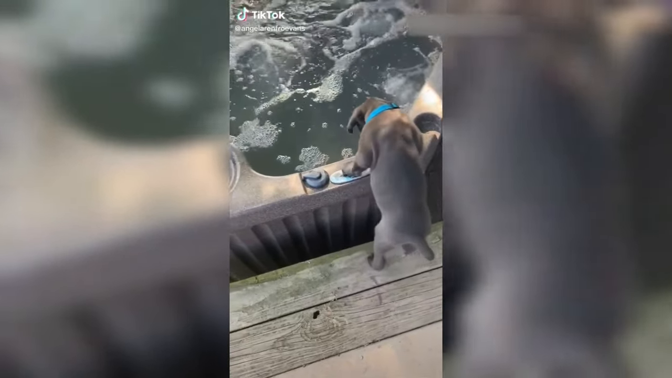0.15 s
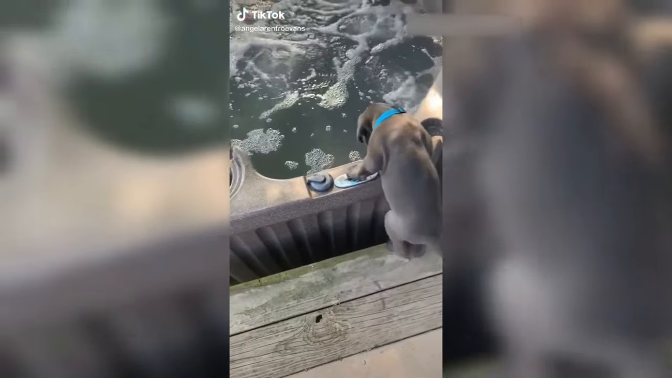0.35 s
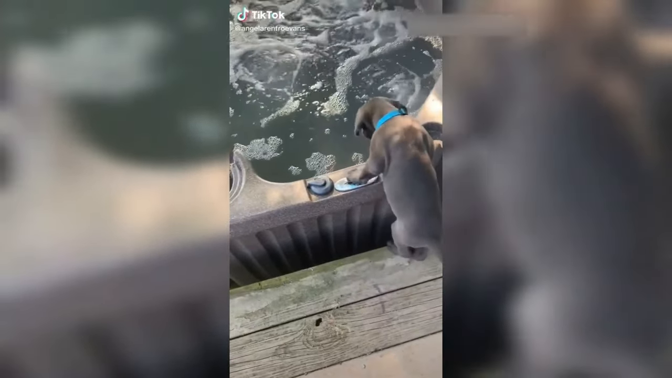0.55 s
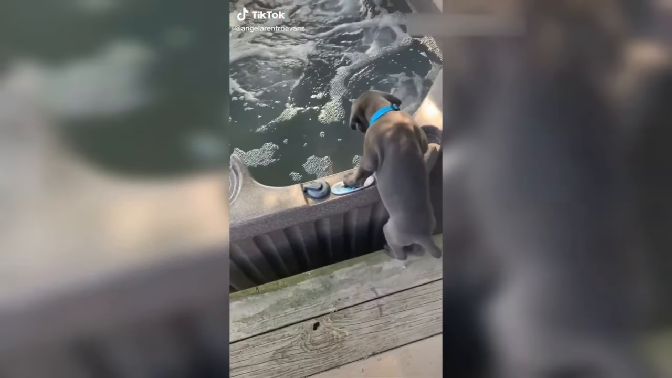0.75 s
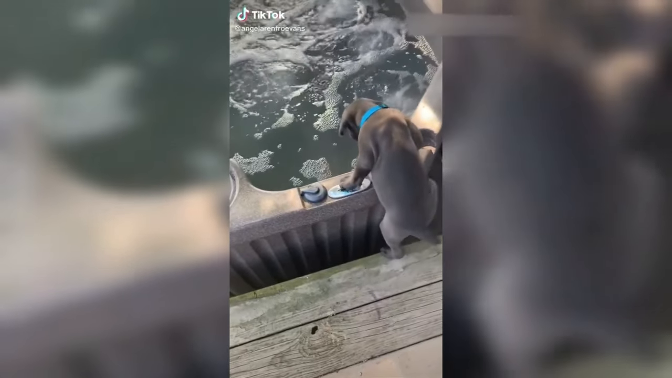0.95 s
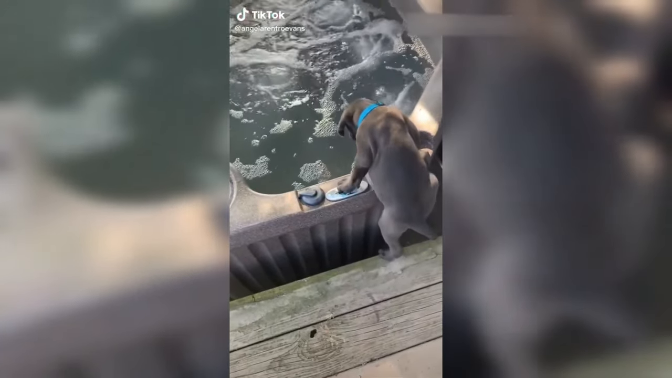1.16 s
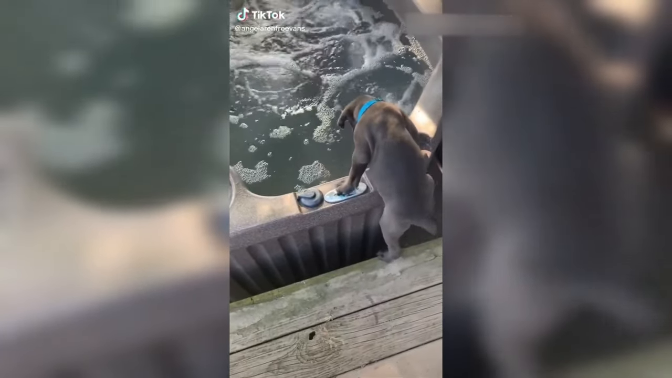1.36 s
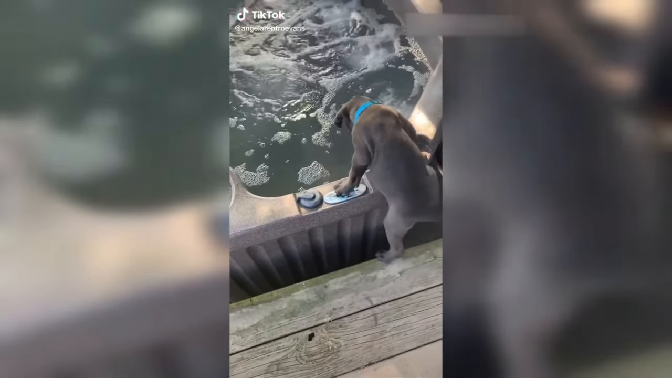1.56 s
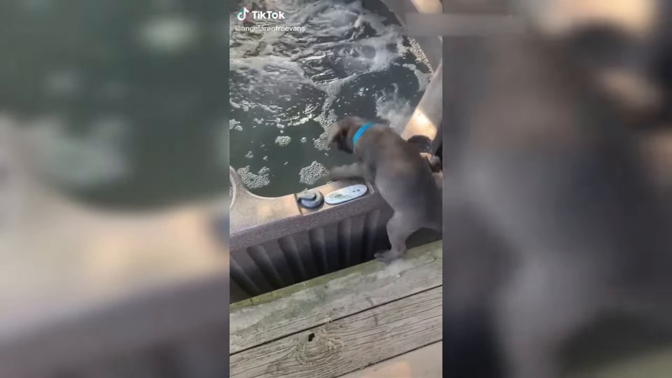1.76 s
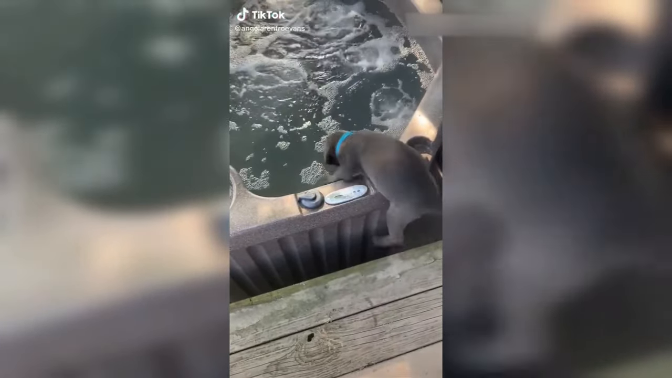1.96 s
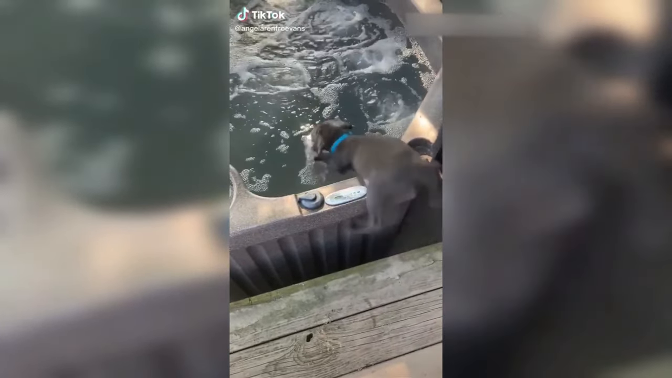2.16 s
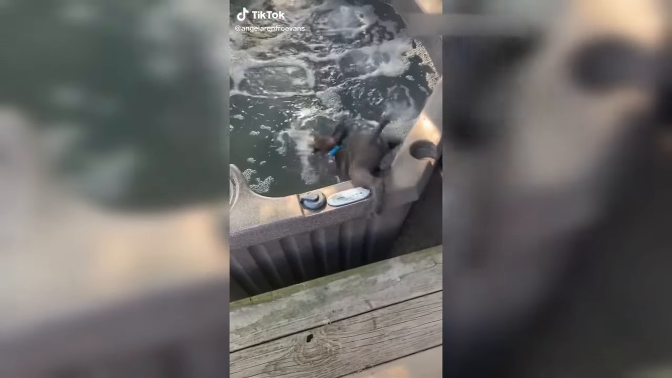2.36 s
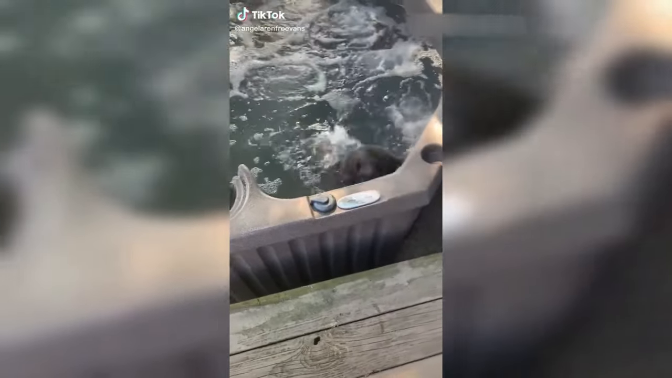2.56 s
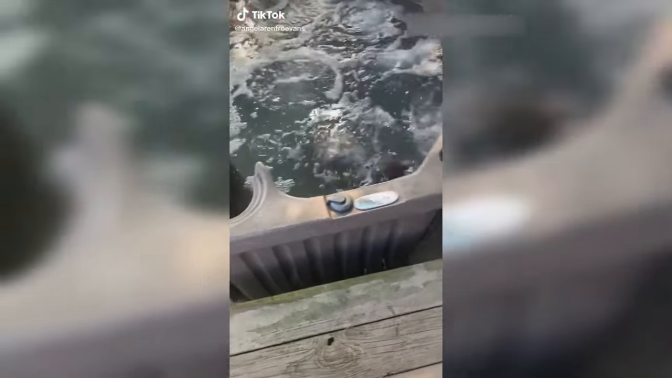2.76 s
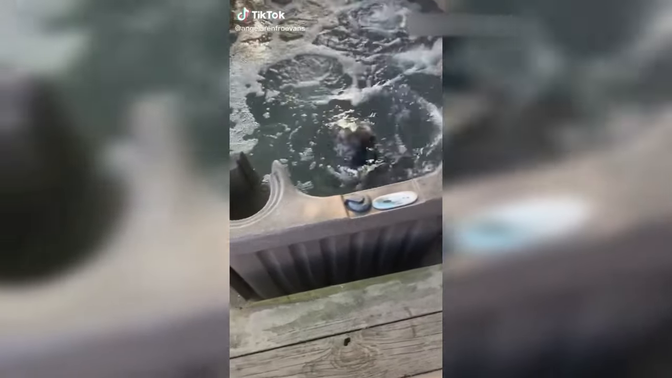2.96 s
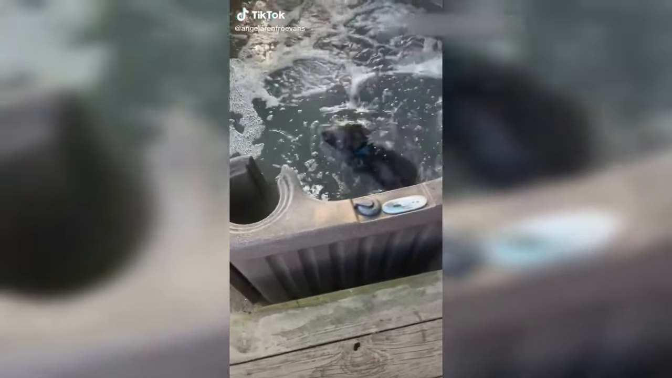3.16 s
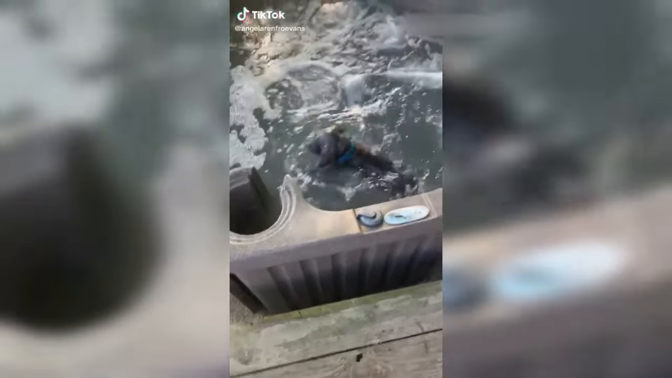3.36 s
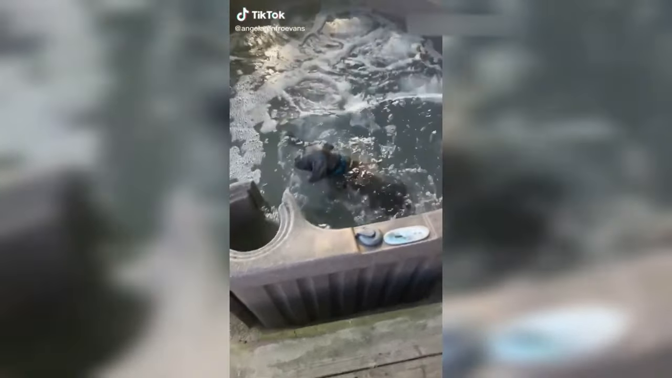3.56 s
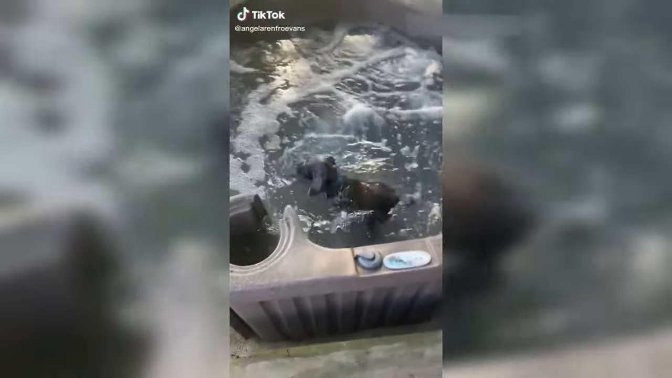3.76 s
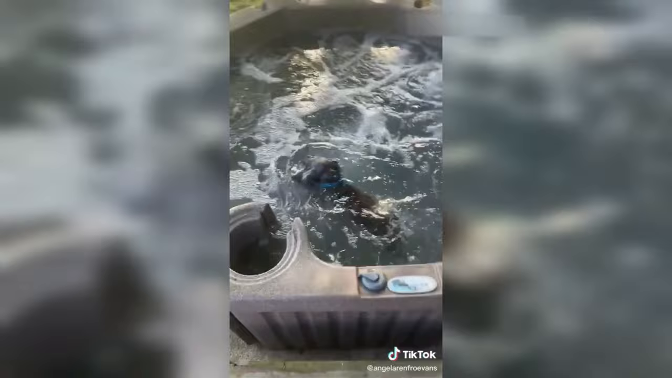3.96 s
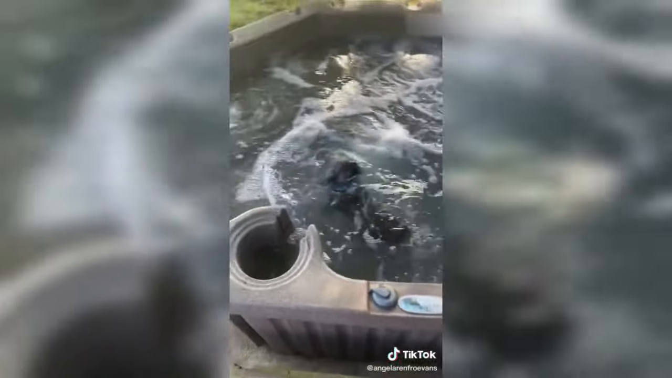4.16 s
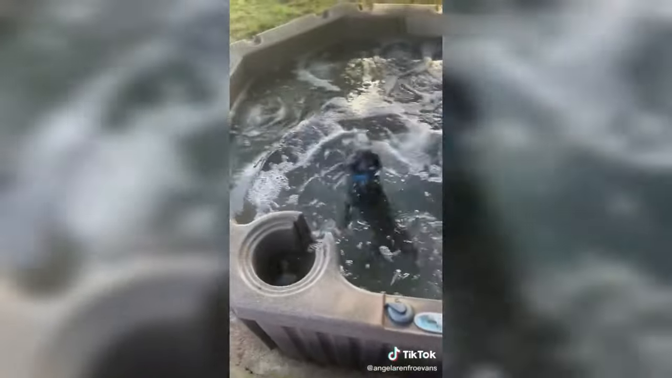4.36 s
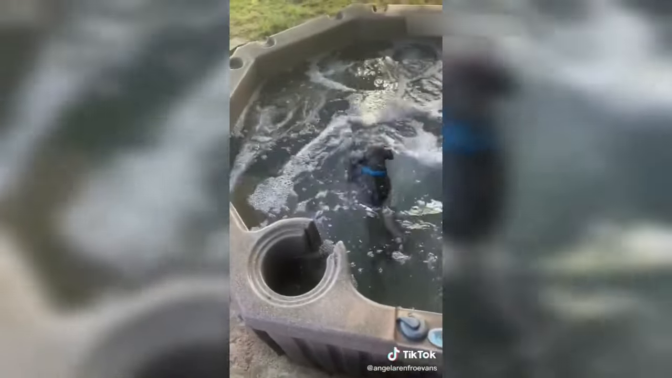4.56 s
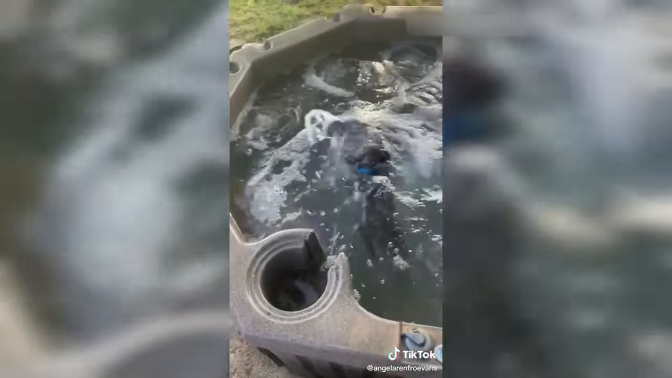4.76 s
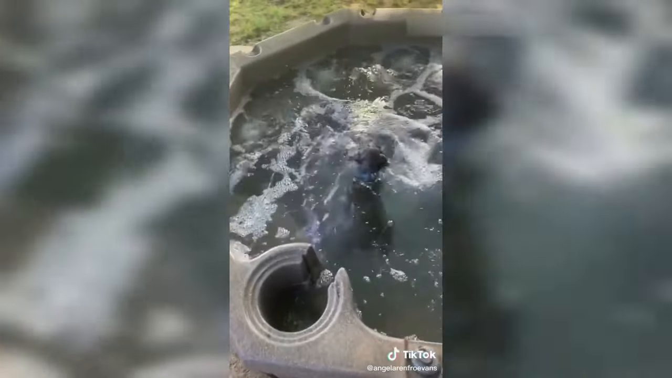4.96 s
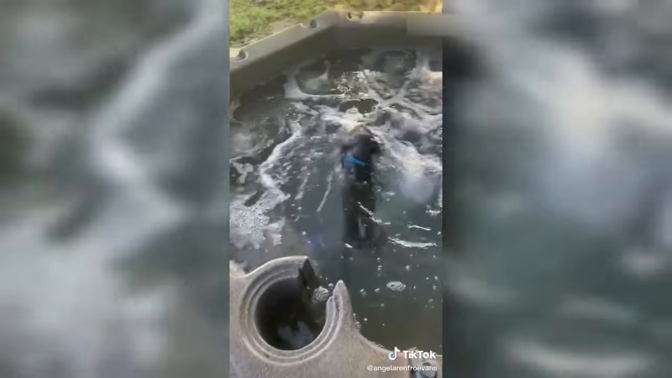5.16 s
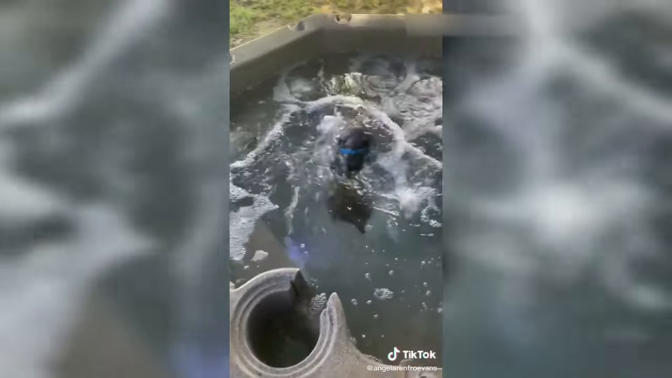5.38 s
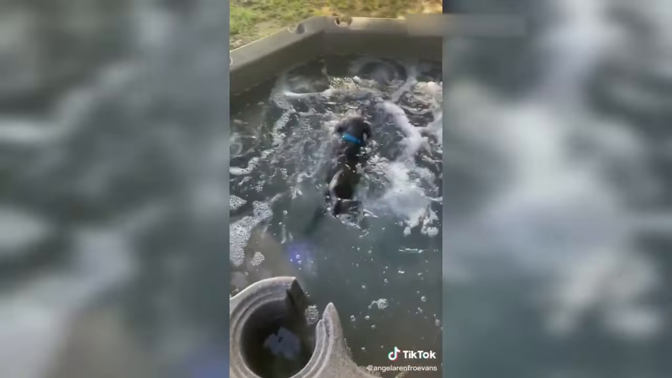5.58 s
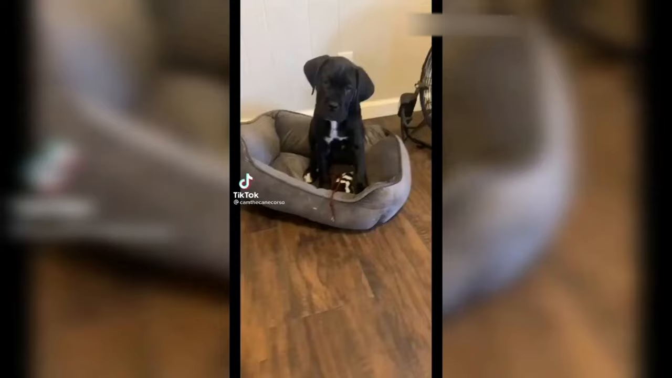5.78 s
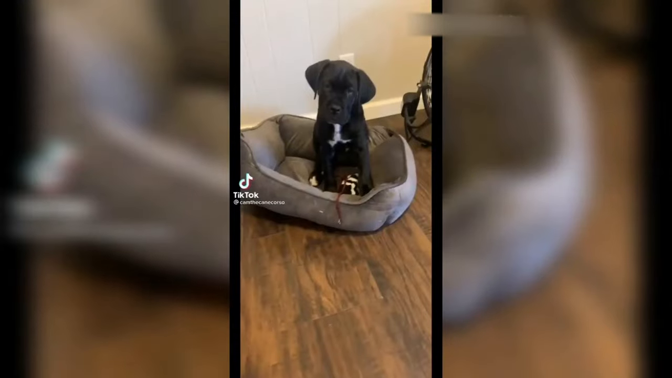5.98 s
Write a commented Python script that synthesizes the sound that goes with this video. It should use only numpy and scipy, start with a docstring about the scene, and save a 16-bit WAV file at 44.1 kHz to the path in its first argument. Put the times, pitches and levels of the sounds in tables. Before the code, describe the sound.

Hot tub jets churn and fizz over a low pump hum; a small dog knocks the plastic rim, plunges in and paddles with gulping splashes.

```python
"""A small dog slips off the plastic rim of an outdoor hot tub, knocks it, plunges in and paddles.
Water closes over air pockets, which ring as damped tones of climbing pitch; slosh and spray are noise with bubbles.
Claws and drops tick on the rim as band-passed bursts, and the knock sums its damped modes.
Behind, jets churn and fizz as coloured noise with bubbles, and the pump hums a wavering sine in the shell.
Left and right differ in level and phase; the sound is switched off just before the end."""
import sys
import numpy as np
from scipy import signal
from scipy.fft import rfft, irfft, next_fast_len
from scipy.io import wavfile
from scipy.ndimage import uniform_filter1d, map_coordinates

SR = 44100
rng = np.random.default_rng(int(sys.argv[2]) if len(sys.argv) > 2 else 0)


def wrap_up_sound(samples):
    """Save the sound to the file named by the first command line argument, as 16-bit audio."""
    columns = np.atleast_2d(samples).T
    # keep every value between -1 and 1, then stretch to whole-number steps
    tamed = np.clip(columns, -1, 1)
    steps = np.round(tamed * 32767).astype(np.int16)
    wavfile.write(sys.argv[1], SR, steps)


N = 265702


def amp(db):
    """Decibel law: a level in dB becomes an amplitude ratio."""
    return 10 ** (np.asarray(db) / 20)


def unit(x):
    """Normalisation: scales a signal to an rms of 1."""
    return x / np.sqrt(np.mean(x ** 2) + 1e-20)


def along(points, hz):
    """Logarithmic frequency scale: interpolates (frequency, value) points at hz."""
    point_hz, value = np.transpose(points)
    return np.interp(np.log(hz + 1), np.log(point_hz + 1), value)


def curves(rows):
    """Linear interpolation in time: one value per sample for each column after the time."""
    s, *columns = np.transpose(rows)
    return [np.interp(np.arange(N) / SR, s, column) for column in columns]


def wobble(rate):
    """Slow random modulation: a smooth curve through rate random knots a second."""
    knots = rng.standard_normal(int(N * rate / SR) + 4)
    return map_coordinates(knots, [np.arange(N) * rate / SR])


def filtered(x, response):
    """Linear filtering: multiplies the spectrum of x by a complex response of frequency."""
    m = next_fast_len(N + SR // 2)
    return irfft(rfft(x, m) * response(np.fft.rfftfreq(m, 1 / SR)), m)[..., :N]


def grains(count, centre_hz, spread, cycles, tail_db):
    """Bubble resonance: two unrelated showers of damped sines whose pitch rises, some louder."""
    start, z, loud = rng.random(count), rng.standard_normal(count), rng.exponential(size=count)
    hz = np.clip(centre_hz * np.exp(spread * z), centre_hz / 3, SR / 3)[:, None]
    k = np.arange(int(6 * max(cycles, 1) * SR / centre_hz))
    turns = hz * k / SR
    size = amp(tail_db * np.minimum(loud, 4))[:, None]
    tone = np.sin(2 * np.pi * turns * (1 + 0.026 * turns / cycles))
    ring = size * tone * np.exp(-turns / cycles)
    at = (start * 2 * N).astype(int)[:, None] + k
    both = np.bincount(at.ravel(), ring.ravel(), 2 * N + len(k))[:2 * N]
    return unit(both.reshape(2, N))


# Likeness of left and right in the water noise: (frequency [Hz], correlation [0 to 1])
LIKENESS = [(60, 0.95), (300, 0.99), (800, 0.7), (2600, .35), (4000, .55), (6500, .5), (8500, .7),
            (12000, .45), (15000, .55)]


def water(spectrum, patchy_db, grainy=0, shower=0):
    """Diffuse turbulence: patchy stereo noise plus a power share of bubbles, coloured, rms 1."""
    z = signal.stft(rng.standard_normal((2, N)), nperseg=512)[2]
    # a random gain smoothed over frequency and time makes the patches
    field = uniform_filter1d(rng.standard_normal(z.shape[1:]), 5, 0)
    field = uniform_filter1d(field, 8, 1)
    noise = unit(signal.istft(z * amp(patchy_db * unit(field)), nperseg=512)[1][:, :N])
    share = np.clip(grainy, 0, 1)
    pair = np.sqrt(1 - share) * noise + np.sqrt(share) * shower

    def colour_and_width(hz):
        turn = np.arccos(np.clip(along(LIKENESS, hz), -1, 1)) / 2
        return amp(along(spectrum, hz)) * [np.cos(turn), np.sin(turn)]

    mid, side = filtered(pair, colour_and_width)
    return unit(np.array([mid + side, mid - side]))


def add(out, s, sound):
    """Superposition: lays a stereo sound into out at time s."""
    part = out[:, round(s * SR):][:, :sound.shape[1]]
    part += sound[:, :part.shape[1]]


# Pump tone in the shell: (frequency [Hz], mean level [dB rms], phase wander [rad])
PUMP_TONES = [(120.83, -42, 0.3)]


def pump():
    """Forced vibration: the shell hums at the pump frequency, unsteady in level and phase."""
    t = np.arange(N) / SR
    hum = np.zeros(N)
    for hz, db, wander in PUMP_TONES:
        level = np.sqrt(2) * amp(db + 2.44 * wobble(4.8))
        hum += level * np.sin(2 * np.pi * hz * t + wander * wobble(5.4))
    return hum


# Course of the deep rumble: (time [s], level [dB])
RUMBLE_LEVEL = [(0, -58), (.13, -37.5), (.35, -43.5), (1.6, -46.5), (1.8, -34.5), (1.98, -46), (2.7, -39),
                (3.0, -38), (3.15, -47), (3.55, -48.5), (3.67, -38.5), (3.8, -46), (4.6, -41.5), (5.1, -43),
                (5.8, -43.5)]
# Colour of the low turbulence: (frequency [Hz], relative level [dB])
RUMBLE_COLOUR = [(18, -66), (30, -28), (50, -4), (65, -4.5), (85, -6.5), (130, -12), (200, -68.5)]
# Colour of the large rolling bubbles: (frequency [Hz], relative level [dB])
CHURN_COLOUR = [(40, -25.5), (90, -22.5), (150, -11.5), (280, -4), (420, -6.5), (600, -11), (800, -17),
                (1200, -57.5)]
# Colour of the bursting foam: (frequency [Hz], relative level [dB])
FIZZ_COLOUR = [(400, -18.5), (720, 21), (950, 8.5), (1500, 6), (2800, -1), (4400, 0.5), (6500, 7.5),
               (10000, 3), (13000, 0), (14800, 7), (15800, -15.5)]


def jets():
    """Turbulence and bubble noise: low rumble, large bubbles rolling up, foam bursting on top."""
    rumble_db, = curves(RUMBLE_LEVEL)
    boil = wobble(6.5)  # shared by churn and fizz
    rumble = amp(rumble_db + 1.5 * wobble(5.04)) * water(RUMBLE_COLOUR, patchy_db=-1.0)
    large = grains(count=2500, centre_hz=324.0, spread=0.525, cycles=4.6, tail_db=-0.5)
    churn = amp(-41 + .4 * boil) * water(CHURN_COLOUR, patchy_db=.4, grainy=.15, shower=large)
    foam = grains(count=14000, centre_hz=5540, spread=0.93, cycles=1.4, tail_db=2.0)
    hiss = water(FIZZ_COLOUR, patchy_db=1.3, grainy=.03, shower=foam)
    fizz = amp(-50.5 + 0.5 * boil + 1.1 * wobble(23)) * hiss
    return rumble + churn + fizz


def tub(x):
    """Reverberation: the tub walls answer with a short, scattered, exponentially dying tail."""
    t = np.arange(SR // 6) / SR
    tail = rng.standard_normal((2, len(t))) * amp(-60 * t / 0.07)  # dies by 60 dB in 0.07 s
    delayed = np.pad(x, ((0, 0), (120, 0)))  # 120 samples, 2.7 ms
    return signal.fftconvolve(delayed, tail / np.linalg.norm(tail[0]), axes=1)[:, :N]


# Drops and claws on the rim: (time [s], burst level before the filters [dB], centre frequency [Hz])
RIM_TICKS = [(0.189, -27.5, 7000), (1.568, -26, 6630), (1.9736, -29, 8190), (2.0713, -26, 6960),
             (2.147, -23.5, 8200), (2.2803, -21.5, 8450), (2.398, -31.5, 8000), (2.456, -16, 9300),
             (2.555, -16, 3420), (2.557, -34, 7960), (2.955, -28.5, 4200), (2.988, -18, 7450),
             (3.294, -14.5, 3300), (4.6882, -21.5, 4180), (5.32, -16, 7700), (5.582, -24, 8500),
             (5.688, -23, 3900)]
# The body meets the rim: (time [s], gain on the modes [dB])
BODY_KNOCK = (2.277, -8)
# Modes of the plastic rim: (frequency [Hz], relative level [dB], 60 dB decay time [s])
RIM_MODES = [(370.4, -7.5, 0.038), (626, -12.5, 0.028), (1189, -4.5, 0.027), (1358, -17, 0.037)]
TICK_T60_S = 0.012
CRACK_DB = -5.5  # burst level at which the wide crack would have a gain of 1; weaker ticks crack less
HOLD = 1.6  # decay exponent, also for the pockets: above 1 a tone holds, then stops short


def rim():
    """Modal impact: narrow ticks with a wide crack, and one hollow knock that excites the rim's modes."""
    out, t = np.zeros((2, N)), np.arange(SR // 5) / SR
    crack_band = signal.butter(2, [2800, 11000], "bandpass", fs=SR)
    for s, db, hz in RIM_TICKS:
        burst = rng.standard_normal(len(t)) * amp(db - 60 * t / TICK_T60_S)
        narrow_band = signal.butter(2, [0.9 * hz, 1.09 * hz], "bandpass", fs=SR)
        peak = signal.lfilter(*narrow_band, burst)
        crack = signal.lfilter(*crack_band, burst)
        add(out, s, np.tile(peak + amp(db - CRACK_DB) * crack, (2, 1)))
    ring = np.zeros(len(t))
    for hz, db, t60 in RIM_MODES:
        ring += amp(db - 60 * (t / t60) ** HOLD) * np.sin(2 * np.pi * hz * t)
    knock_s, knock_db = BODY_KNOCK
    attack = 1 - np.exp(-t / 0.00043)
    add(out, knock_s, np.tile(amp(knock_db) * ring * attack, (2, 1)))
    return out


# Thrown water: (time at full strength [s], hold [s], slosh level [dB], spray level [dB])
THROWS = [(2.065, 0.024, -50, -50), (2.138, 0.27, -48.5, -50), (2.276, 0.015, -31, -35.5),
          (2.456, 0.078, -35, -39.5), (2.555, 0.013, -38, -41), (2.61, 0.27, -76, -55),
          (2.95, 0.017, -55, -47.5), (3.05, 0.16, -47.5, -52), (3.528, 0.029, -46.5, -56),
          (3.932, 0.026, -50.5, -68), (4.056, 0.0061, -46.5, -54.5), (4.313, 0.077, -43.5, -51.5),
          (4.408, 0.014, -42, -45), (4.629, 0.13, -40, -51.5), (4.725, 0.025, -40, -40.5),
          (4.745, 0.031, -31.5, -45), (4.825, 0.011, -47, -51), (4.947, 0.03, -38, -44.5),
          (5.005, 0.012, -44.5, -46.5), (5.22, 0.058, -39, -46), (5.304, 0.051, -41, -46),
          (5.382, 0.063, -51.5, -58), (5.518, 0.023, -38.5, -45.5), (5.779, .047, -33, -43)]
# Colour of the slosh: (frequency [Hz], relative level [dB])
SLOSH_COLOUR = [(200, -30), (400, -1.5), (1200, -4), (2300, -5), (4400, -10), (7000, -45)]
# Colour of the spray: (frequency [Hz], relative level [dB])
SPRAY_COLOUR = [(1500, -44), (3000, -4), (8300, 14.5), (11000, 3.5), (14800, 7), (15800, 6.5)]
# Water lapping in the tub, faint from the start and stronger after the plunge: (time [s], level [dB])
LAP_LEVEL = [(1.9, -58.5), (2.1, -58), (2.7, -50.5), (3.6, -55.5), (4.5, -55), (5.8, -51)]
# Colour of the lapping: (frequency [Hz], relative level [dB])
LAP_COLOUR = [(450, -18.5), (800, 1), (1800, -1), (2700, -3), (4300, 0), (5500, -30)]
THROW_S, FALL_30DB_S = 0.007, 0.12  # every splash swells this long, and falls 30 dB in this time


def splash():
    """Bubble entrainment: thrown water sloshes with mid-sized bubbles and sprays crackling droplets."""
    t = np.arange(N) / SR
    power = np.zeros((2, N))  # powers of overlapping splashes add
    for s, hold_s, slosh_db, spray_db in THROWS:
        rise = np.clip(1 + (t - s) / THROW_S, 0, 1) ** 3
        fall = amp(-60 * np.clip(t - s - hold_s, 0, 1) / FALL_30DB_S)
        power += amp([[2 * slosh_db], [2 * spray_db]]) * rise * fall
    bubbles = grains(count=5500, centre_hz=1900, spread=.6, cycles=10, tail_db=3)
    drips = grains(count=2600, centre_hz=2000, spread=.55, cycles=9, tail_db=3)
    drops = grains(count=5000, centre_hz=5420, spread=0.55, cycles=9.7, tail_db=2.0)
    slosh = amp(1.6 * wobble(60)) * water(SLOSH_COLOUR, patchy_db=2.5, grainy=.28, shower=bubbles)
    spray = amp(2 * wobble(70)) * water(SPRAY_COLOUR, patchy_db=2.2, grainy=.2, shower=drops)
    lap = water(LAP_COLOUR, patchy_db=3.5, grainy=.3, shower=drips)
    lapping = amp(curves(LAP_LEVEL)[0] + 1.8 * wobble(18)) * lap
    return np.sqrt(power[0]) * slosh + np.sqrt(power[1]) * spray + lapping


# Ringing air, from big hollows behind a paw to small drops:
# (time [s], tone level before attack and decay [dB], starting pitch [Hz])
AIR_POCKETS = [(1.436, -42.5, 1280), (2.16, -34.5, 1306), (2.198, -34, 1330), (2.454, -23.5, 386),
               (2.476, -33, 1234), (2.493, -28, 3220), (2.556, -30.5, 1480), (2.559, -28.5, 2100),
               (2.69, -44, 1450), (2.89, -40.5, 3210), (3.056, -30.5, 1172), (3.104, -28, 805),
               (3.148, -35.5, 1630), (3.163, -32, 1240), (3.412, -35, 1300), (3.915, -36, 1200),
               (3.934, -33.5, 1100), (4.055, -41.5, 2000), (4.321, -35.5, 1090), (4.327, -28, 2450),
               (4.378, -42, 1790), (4.415, -21, 976), (4.632, -26.5, 1534), (4.655, -22, 938),
               (4.755, -16, 344), (4.7595, -17.5, 705), (4.779, -19.5, 302), (4.799, -25, 1174),
               (4.948, -21.5, 1574), (4.951, -17.5, 1041), (4.963, -24.5, 1063), (5.003, -27, 433),
               (5.016, -24, 755), (5.225, -25.5, 1865), (5.239, -22, 386), (5.253, -18, 390),
               (5.279, -20.5, 360), (5.328, -18.5, 184), (5.325, -28.5, 2040), (5.335, -25, 2920),
               (5.396, -23, 394), (5.409, -28.5, 765), (5.502, -35.5, 1354), (5.518, -15, 1039),
               (5.523, -22.5, 365), (5.539, -33, 870), (5.549, -14, 83), (5.781, -23, 670),
               (5.791, -16, 288)]
RING_T60_S, DAMPED_HZ = 0.033, 2480  # large pockets ring about this long; at this pitch half as long
CLOSE_CYCLES = 1  # attack time constant [cycles]
CLIMB = 0.091  # the pitch rises by twice this fraction over the 60 dB decay
SLAP_DB = -10.5  # rms of the slap against the tone's amplitude


def pockets():
    """Bubble resonance: water slaps shut over air, which rings with climbing pitch; small ones die sooner."""
    out, t = np.zeros((2, N)), np.arange(SR // 5) / SR
    for s, db, hz in AIR_POCKETS:
        t60 = RING_T60_S / (1 + (hz / DAMPED_HZ) ** 3)
        ring = np.sin(2 * np.pi * hz * t * (1 + CLIMB * t / t60))
        band = signal.butter(2, [0.31 * hz, 1.03 * hz], "bandpass", fs=SR)
        slap = signal.lfilter(*band, rng.standard_normal((2, len(t))))
        attack = 1 - np.exp(-t * hz / CLOSE_CYCLES)
        decay = amp(db - 60 * (t / t60) ** HOLD)
        add(out, s, (ring + amp(SLAP_DB) * unit(slap)) * decay * attack)
    return out


# The swimmer moves to the right: (time [s], left-right level difference [dB])
SWIMMER_PAN = [(0, 2), (3, -1), (4.5, -2), (5.8, -2)]


def scene():
    """Superposition: pump, jets and the panned pockets, rim and splash; pockets and rim also excite the tub."""
    pan_db, = curves(SWIMMER_PAN)
    gulps = pockets()
    edge = rim()
    echo = tub(amp(-3.5) * gulps + amp(-3.5) * edge)
    swimmer = (gulps + edge + echo + splash()) * amp([pan_db / 2, -pan_db / 2])
    return pump() + jets() + swimmer


# Level difference between left and right: (frequency [Hz], left-right level difference [dB])
STEREO_TILT = [(60, -0.5), (500, -3), (2000, 0.5)]
# Phase difference between left and right, varying with frequency:
# (frequency [Hz], phase lead of the left [rad])
STEREO_PHASE = [(0, 0), (500, -.4), (900, -3.1), (1400, -6.3), (2600, -3.1), (3900, -5.5), (5300, -3.1),
                (7700, 0)]
OFF_S, TOP_HZ = 5.804, 15780  # switch-off time; upper band limit, at half amplitude


def record(dry):
    """Linear stereo filtering: level and phase differ by side; switch-off leaves a brief faint remnant."""
    half = np.array([[.5], [-.5]])

    def sides(hz):
        phase = half * np.interp(hz, *np.transpose(STEREO_PHASE))
        return amp(half * along(STEREO_TILT, hz)) * np.exp(1j * phase)

    heard = filtered(dry, sides)
    after = np.arange(N) / SR - OFF_S
    # the remnant starts 23.5 dB down, falls 1000 dB/s and ends after 32 ms
    remnant = amp(-23.5 - 1000 * np.clip(after, 0, 1)) * (after < .032)
    gate = np.where(after < 0, 1, remnant)
    return filtered(heard * gate, lambda hz: 1 / (1 + (hz / TOP_HZ) ** 160))


dry = scene()
out = record(dry)
wrap_up_sound(out)
```